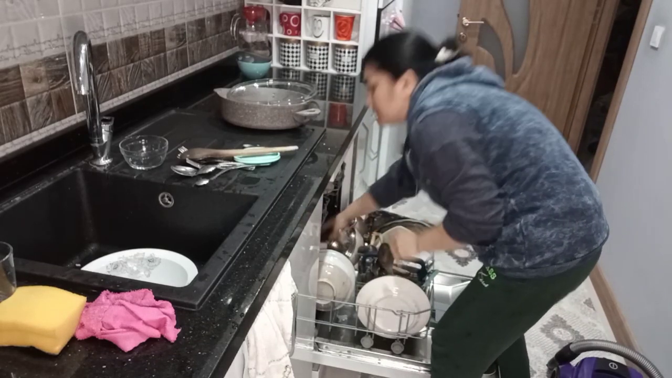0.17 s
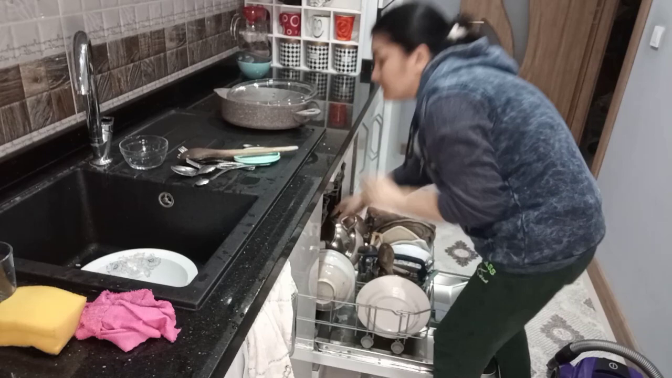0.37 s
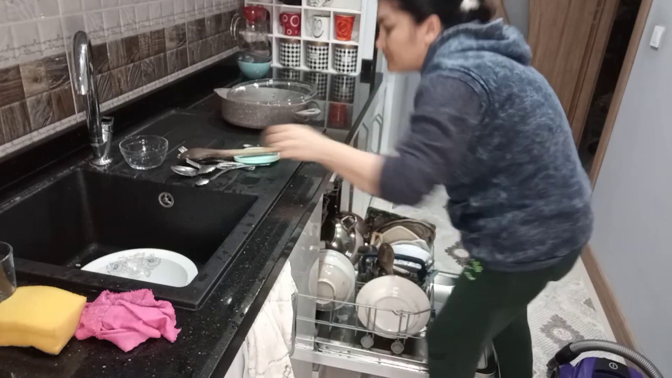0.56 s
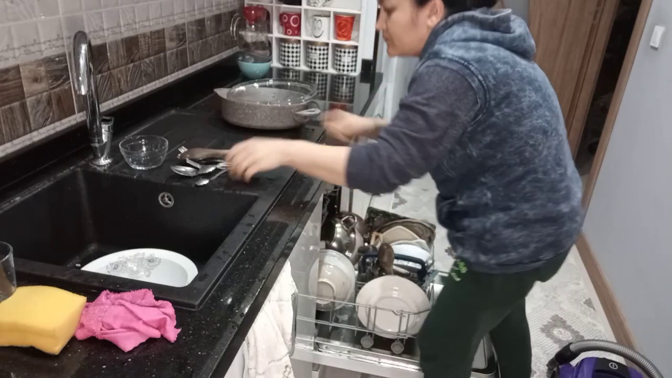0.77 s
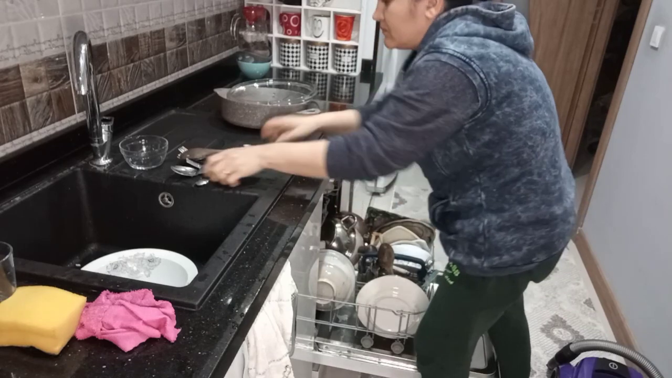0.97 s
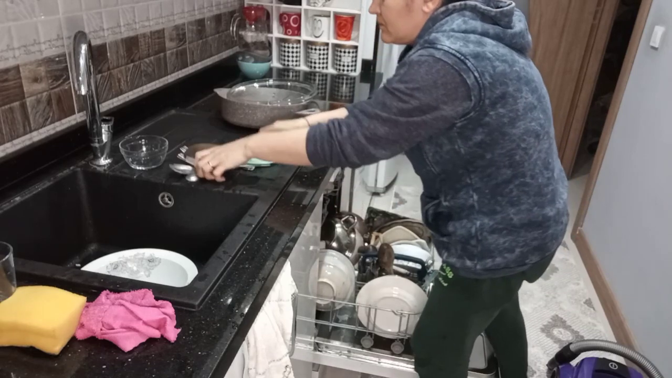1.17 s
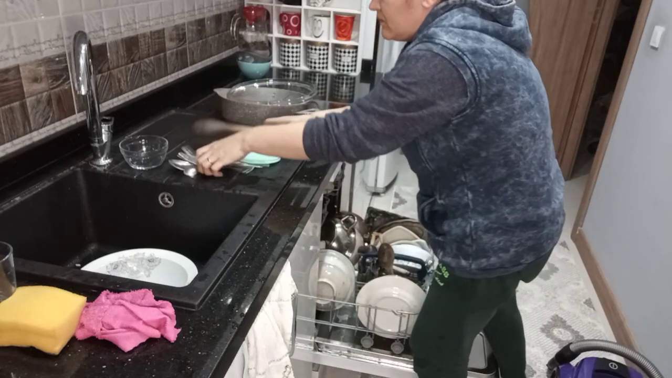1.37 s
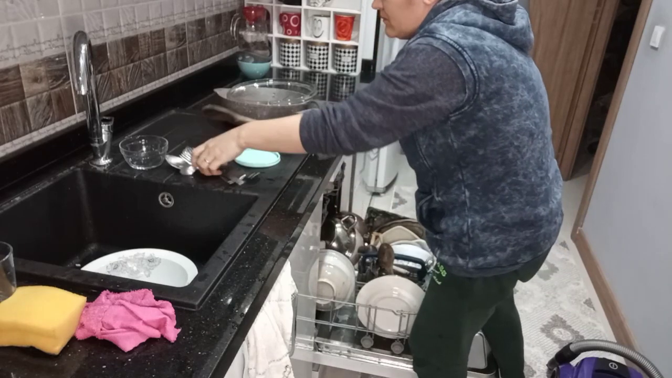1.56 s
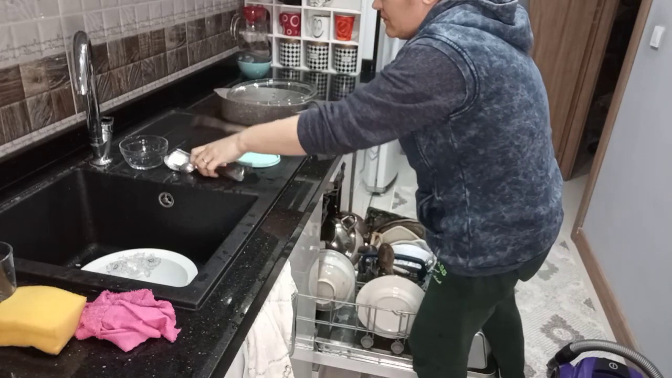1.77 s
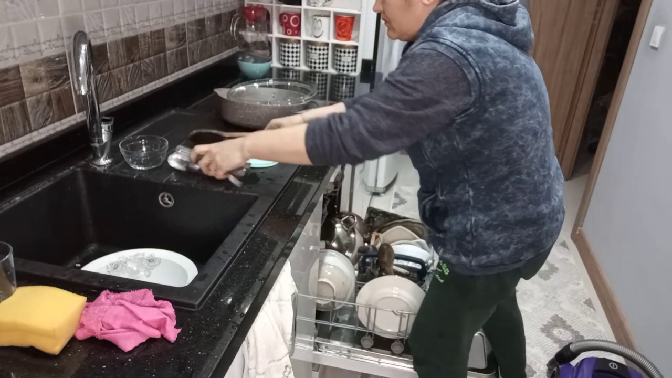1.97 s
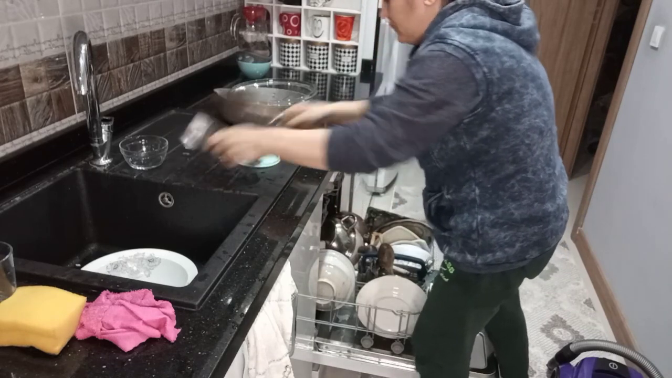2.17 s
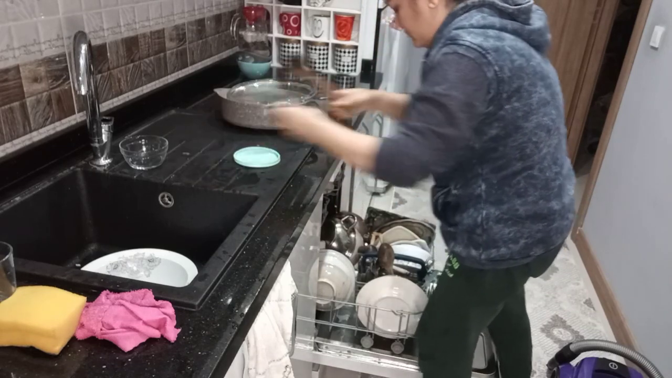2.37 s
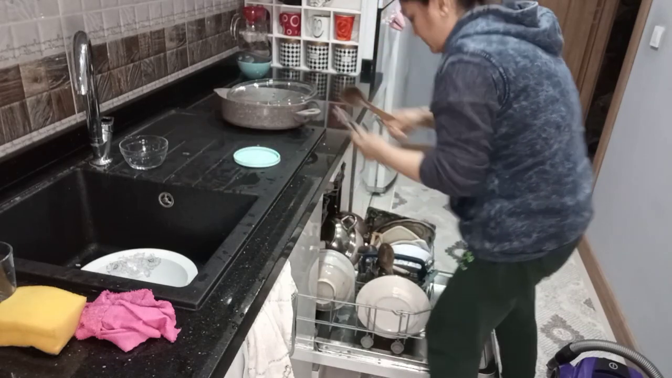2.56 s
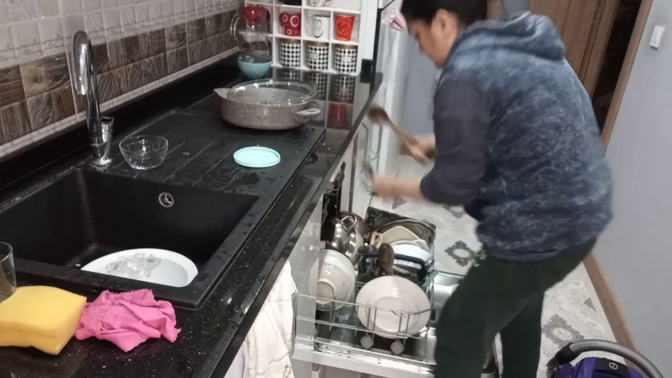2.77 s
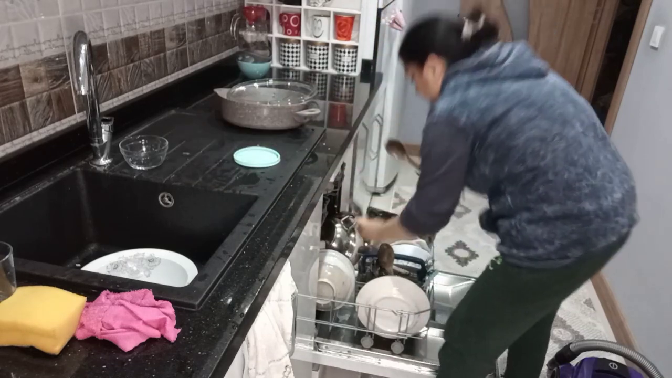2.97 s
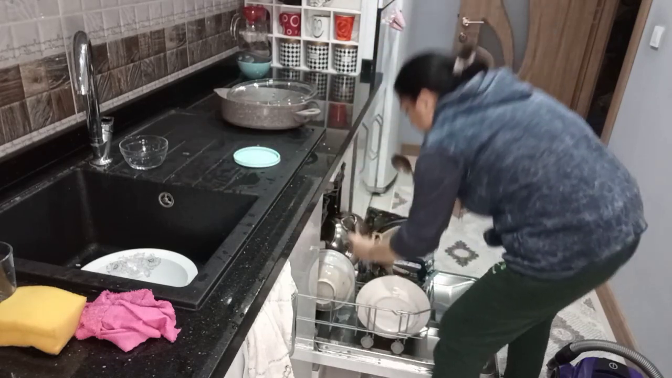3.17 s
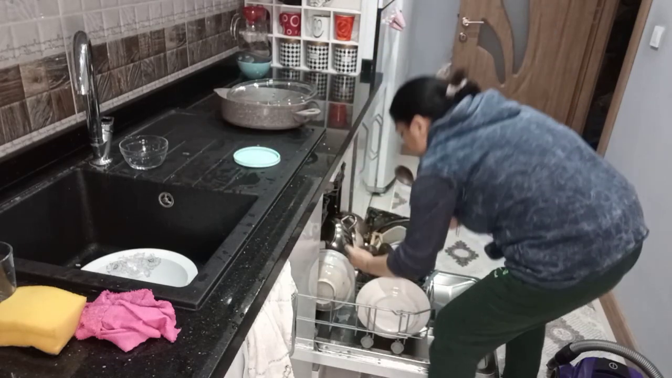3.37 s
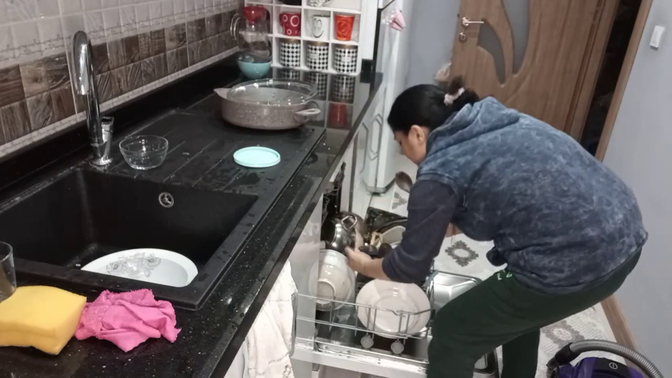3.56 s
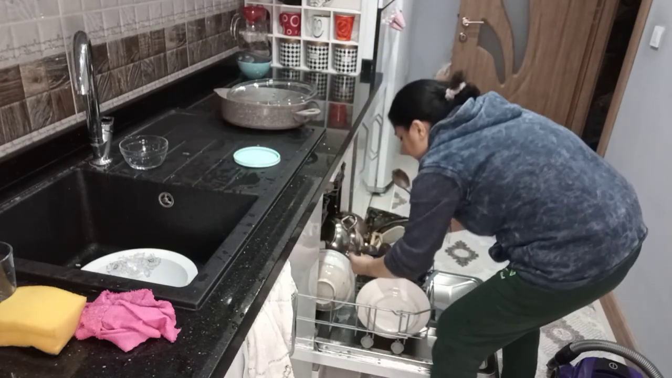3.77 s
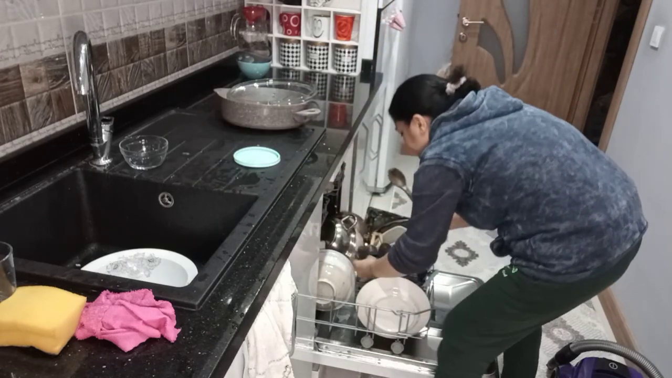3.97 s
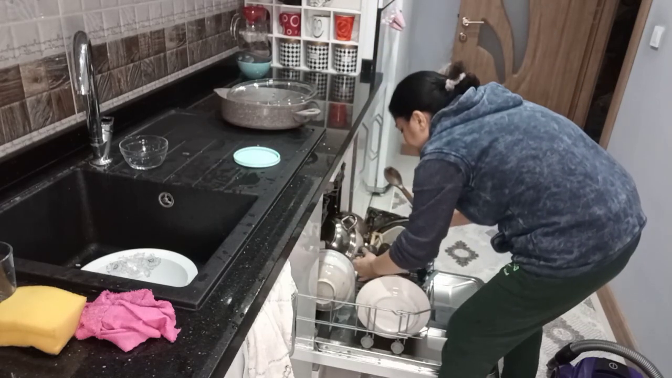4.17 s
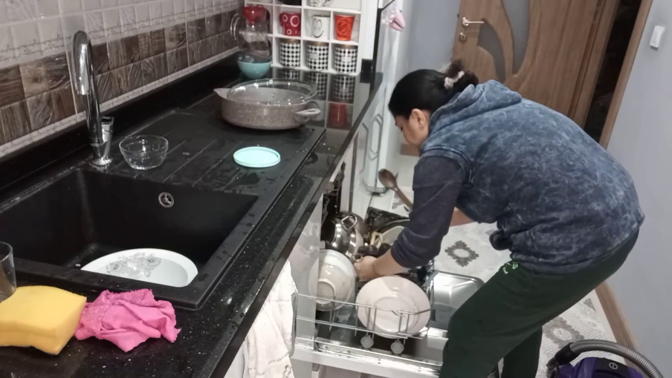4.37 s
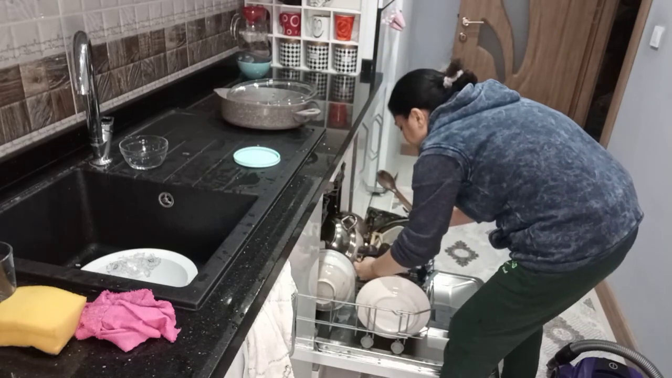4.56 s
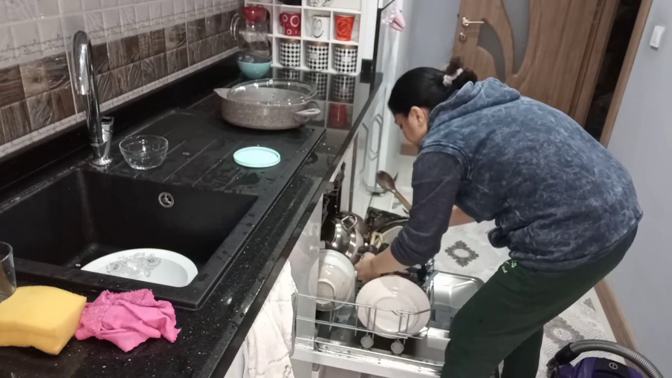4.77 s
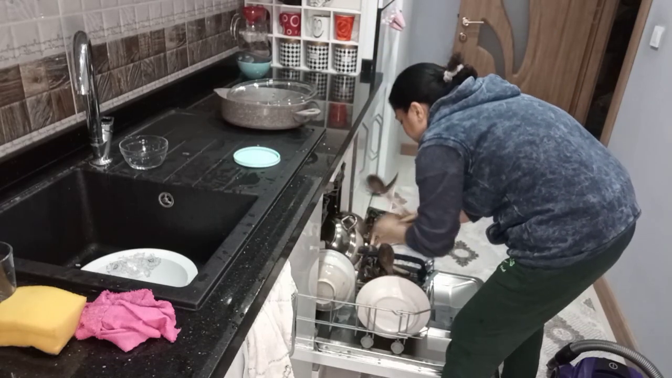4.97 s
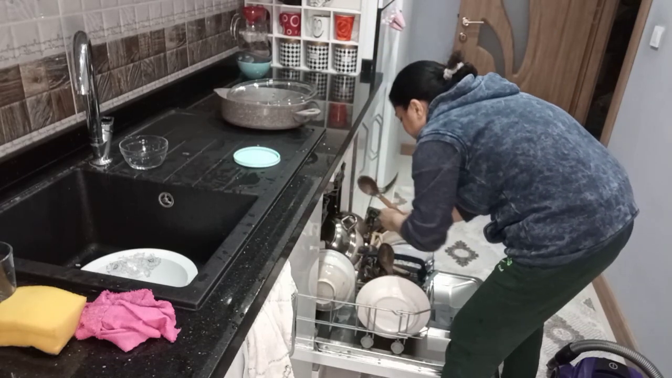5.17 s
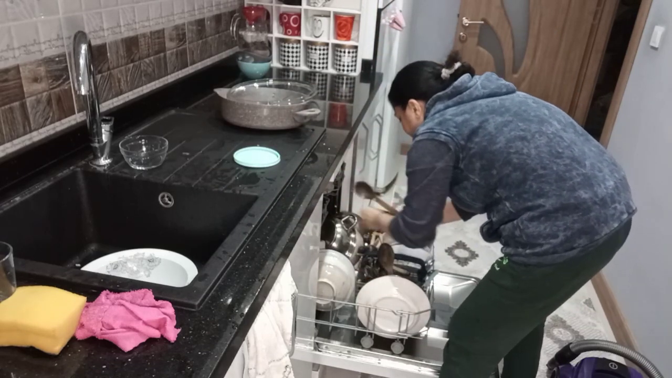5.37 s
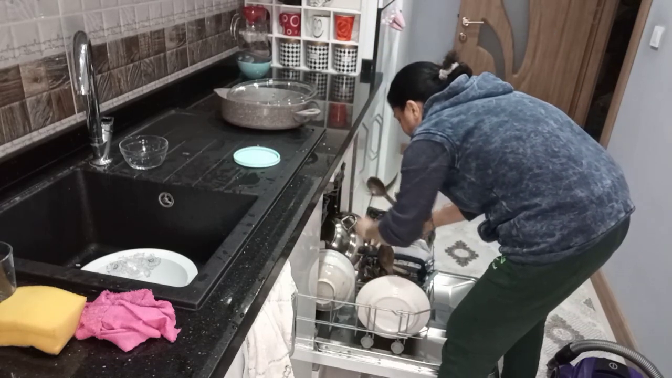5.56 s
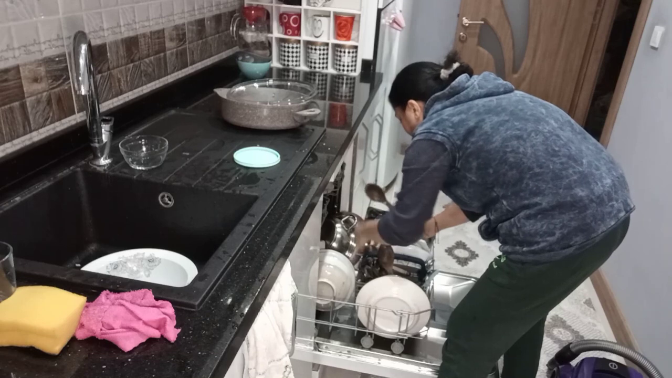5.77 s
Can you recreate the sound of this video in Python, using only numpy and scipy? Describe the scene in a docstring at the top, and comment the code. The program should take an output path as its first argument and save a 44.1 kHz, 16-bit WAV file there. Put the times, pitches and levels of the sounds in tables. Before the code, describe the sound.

Dull rack knocks, then spoons clink and scrape across a stone worktop before cutlery clatters brightly into a dishwasher basket in a tiled kitchen.

```python
"""Cutlery is gathered from a stone worktop and dropped into a plastic dishwasher basket in a tiled kitchen.
Dull knocks in the rack come first; more follow, with a few lighter clinks: resonances, ticks, rebounds.
From 1.1 s spoons clink and scrape on the stone, and near 2 s a large one rings: force pulses excite steel.
From 3.5 s pieces clatter into the basket and jostle; long modes of the bundle and single pieces sing on.
Banded hiss and a hum lie under it all, joined by a faint low drone from 3.1 to 4.25 s."""
import sys
import numpy as np
from scipy import signal
from scipy.fft import rfft, irfft
from scipy.io import wavfile

SR = 44100
rng = np.random.default_rng(int(sys.argv[2]) if len(sys.argv) > 2 else 0)


def wav_record(signal):
    """Record a signal, one row per channel, as 16-bit PCM in the file named by sys.argv[1]."""
    frames = np.transpose(np.atleast_2d(signal))
    bounded = np.clip(frames, -1, 1)
    # unit amplitude maps onto the largest positive 16-bit level
    quanta = np.round(bounded * 32767).astype(np.int16)
    wavfile.write(sys.argv[1], SR, quanta)


N = 257103
TIME = np.arange(N) / SR


def from_db(db):
    """Amplitude factor for a level in dB."""
    return 10 ** (np.asarray(db) / 20)


def rms_one(x):
    """Scales a signal to an rms of 1."""
    return x / np.sqrt(np.mean(x ** 2) + 1e-20)


def unit_energy(x):
    """Scales a signal so that its squares sum to 1."""
    return x / np.sqrt(np.sum(x ** 2) + 1e-20)


def at_hz(points, hz):
    """Reads a table along log frequency."""
    table = np.array(points)
    return np.interp(np.log(hz + 1), np.log(table[:, 0]), table[:, 1])


def level_curve(points_s, levels_db):
    """Amplitude that follows breakpoints in dB, practically silent outside them."""
    return lambda t: from_db(np.interp(t, points_s, levels_db, left=-200, right=-200))


def band(x, low, high, order=3):
    """Butterworth band-pass."""
    edges = [low, min(high, SR / 2 - 100)]
    return signal.sosfilt(signal.butter(order, edges, "band", fs=SR, output="sos"), x + 1e-18)


def through(x, response):
    """Convolves a sound with a response, cut to the scene's length."""
    return signal.oaconvolve(x, response)[:N]


def colour(spectrum, peaks, size=2048):
    """Causal (minimum-phase) response with a broad spectrum and resonances on top."""
    hz = np.fft.rfftfreq(size, 1 / SR)
    db = at_hz(spectrum, hz) + sum(boost / (1 + (2 * (hz - f) / width) ** 2) for f, width, boost in peaks)
    # folding the cepstrum onto positive time makes the phase minimal
    cepstrum = irfft(np.log(from_db(db)))
    cepstrum[1:size // 2] *= 2
    cepstrum[size // 2 + 1:] = 0
    return irfft(np.exp(rfft(cepstrum)))


def dying(start, t60, rise_s=0.0028):
    """Amplitude of something struck at start: a short rise, then a steady fall in dB."""
    rise = np.clip((TIME - start) / rise_s, 0, 1)
    return rise * from_db(-60 * np.clip((TIME - start) / t60, 0, 2))


def drift(rate_hz):
    """Smooth random wandering with a spread of 1."""
    hz = np.fft.rfftfreq(N, 1 / SR)
    count = int(np.sum(hz < 200))   # drawn at a low sample rate, then interpolated
    white = rfft(rng.standard_normal(4 * count))
    slow = irfft(white / (1 + (hz[:2 * count + 1] / rate_hz) ** 4))
    return np.interp(np.linspace(0, len(slow) - 1, N), np.arange(len(slow)), rms_one(slow))


def tone(hz, waver):
    """A mode as heard among its own reflections, which make it waver; rms 1."""
    phase = 2 * np.pi * hz * TIME
    steady = (np.sqrt(2) + waver * drift(37)) * np.sin(phase)
    return rms_one(steady + waver * drift(22) * np.cos(phase))


def ring(force, hz, t60):
    """One mode as a two-pole resonator; a unit click leaves unit energy in it."""
    r, w = from_db(-60 / (t60 * SR)), 2 * np.pi * hz / SR
    mode = signal.lfilter([0, np.sin(w)], [1, -2 * r * np.cos(w), r * r], force + 1e-18)
    return np.sqrt(2 * (1 - r * r)) * mode


def resonance(hz, octaves, size=8192):
    """Response of a broad or narrow resonance to a click; unit energy."""
    half = 2 ** (octaves / 2)
    return unit_energy(band(signal.unit_impulse(size), hz / half, hz * half, order=2))


# decay of the tiled room: [f/Hz, t60/s]
ROOM_DECAY = [(100, 0.4), (400, 0.39), (1000, 0.48), (3000, 0.49), (7000, 0.41), (11000, 0.34),
              (16000, 0.33)]


def kitchen(direct_db=-17, build_s=0.0035, early_db=-2, early_s=0.008):
    """Room response: a weak direct sound, dense early reflections, a tail whose decay varies with pitch."""
    t = TIME[:SR // 2]
    edges = np.geomspace(40, 20000, 10)
    white, hz, tail = rfft(rng.standard_normal(len(t))), np.fft.rfftfreq(len(t), 1 / SR), 0
    swell = (1 + from_db(early_db) * np.exp(-t / early_s)) * (1 - np.exp(-t / build_s))
    for low, high in zip(edges, edges[1:]):
        decay = from_db(-60 * t / at_hz(ROOM_DECAY, np.sqrt(low * high)))
        echoes = irfft(white * (hz >= low) * (hz < high), len(t)) * swell * decay
        tail = tail + unit_energy(echoes) * np.sqrt(high - low)   # equal energy per Hz
    response = unit_energy(tail)
    response[0] += from_db(direct_db)
    return unit_energy(response)


# broad colour of the quiet kitchen: [f/Hz, relative level per Hz/dB]
HISS_COLOUR = [(25, -10), (70, -5), (150, -2.5), (300, -4.5), (600, -7), (1200, -17.5), (1700, -3),
               (2500, 3), (3100, -13.5), (4400, -5), (7000, -7.5), (11700, -9), (12400, -24.5),
               (16000, -40.5)]
# bands where the hiss stands out: [f/Hz, width/Hz, boost/dB]
HISS_BANDS = [(2170, 353, 12.7), (4353, 84, 15), (4906, 420, 12.7), (7300, 73, 13), (8790, 170, 12.5),
              (15200, 2100, 24)]
# the drone comes and goes: [t/s, level/dB]
DRONE_LEVEL = [(3.1, -99), (3.35, -75), (4.05, -71.5), (4.25, -90)]
DRONE_HZ, HUM_HZ, HUM_DB, HISS_DB = 219, 101.6, -82.5, -68


def background():
    """Coloured noise for the banded hiss, wavering sines for the hum and the passing drone."""
    hiss = rms_one(through(rng.standard_normal(N), colour(HISS_COLOUR, HISS_BANDS)))
    hum = from_db(HUM_DB) * tone(HUM_HZ, waver=0.51)
    drone = level_curve(*np.transpose(DRONE_LEVEL))(TIME) * tone(DRONE_HZ, waver=0.67)
    return from_db(HISS_DB) * hiss + hum + drone


GRAZE_S, GRAZE_DB = .005, -12.5   # a weaker touch just before each strike

# knocks in the rack and a few lighter clinks:
# [t/s, f/Hz, relative level/dB, width/octaves, rebound against the first contact/dB]
KNOCKS_AND_CLINKS = [(0.057, 834, -48, 0.51, -7.5), (.17, 282, -62, 0.67, -14),
                     (0.194, 830, -52.5, 0.32, -14), (.286, 667, -48.5, 0.95, -2),
                     (0.365, 227, -59.5, 0.22, -14), (.929, 417, -68, 1.8, -6.5),
                     (2.202, 1260, -60, 2.5, -32), (2.778, 4200, -62.5, 0.2, -30),
                     (3.673, 673, -50.5, 3.4, -11), (3.914, 1590, -47, 1.2, -3),
                     (4.192, 233, -56.5, 0.33, -21), (4.31, 414, -45, 0.54, -21.5),
                     (4.663, 890, -60.5, 2.3, -5), (4.74, 2030, -44.5, 1.6, -15),
                     (4.746, 390, -51.5, 1.6, -31), (5.008, 800, -49, 1.24, -12.5),
                     (5.205, 5960, -61, 0.11, -25), (5.208, 4220, -59, 0.18, -23),
                     (5.342, 346, -62, 0.3, -24), (5.382, 340, -61, 0.85, -21),
                     (5.728, 790, -55.5, 0.36, -15.5)]
REBOUND_S, REBOUND_PITCH, REBOUND_OCTAVES = .031, .5, 1.16   # later and an octave lower
TICK_PITCH, TICK_OCTAVES, TICK_DB = 2.9, 1.27, -14   # pitch and level against a firm contact
FIRM_DB, TICK_GROWTH = -51, 0.3   # the tick gains on the resonance, in dB per dB beyond a firm contact


def knocks_and_clinks(level_db, second_tick_db=4):
    """Knocks and clinks: a broad or narrow resonance and a tick, then a lower rebound with its own tick."""
    out = np.zeros(N + SR)
    for s, hz, db, octaves, rebound_db in KNOCKS_AND_CLINKS:
        tick_db = db + TICK_DB + TICK_GROWTH * (db - FIRM_DB)
        tick = from_db(tick_db) * resonance(hz * TICK_PITCH, TICK_OCTAVES)
        first = from_db(db) * resonance(hz, octaves) + tick
        lower = from_db(db) * resonance(hz * REBOUND_PITCH, REBOUND_OCTAVES)
        second = lower + from_db(second_tick_db) * tick
        graze = (s - GRAZE_S, from_db(GRAZE_DB) * first)
        rebound = (s + REBOUND_S, from_db(rebound_db) * second)
        for start, contact in [graze, (s, first), rebound]:
            at = int(start * SR)
            out[at:at + len(contact)] += contact
    return from_db(level_db) * out[:N]


# single pieces left free to sing at one pitch: [t/s, f/Hz, level/dB]
SINGING_PIECES = [(4.106, 14680, -26.5), (4.121, 14530, -22), (4.16, 5590, -44.5), (4.291, 3520, -48),
                  (4.3, 5380, -46), (4.562, 14700, -36), (4.748, 12600, -67), (4.871, 6800, -53),
                  (4.89, 15270, -37), (4.944, 8823, -49.5), (4.995, 11430, -57.5), (5.003, 7030, -55.5)]
# the highest modes die soonest: [f/Hz, t60/s]
SINGING_DECAY = [(3500, 0.27), (6500, .38), (12500, 0.22), (14600, 0.08)]


def free_rings():
    """Now and then one piece hangs free and sings: a wavering sine with a pitch-dependent decay."""
    return sum(from_db(db) * dying(s, at_hz(SINGING_DECAY, hz)) * tone(hz, waver=0.44)
               for s, hz, db in SINGING_PIECES)


# modes of the large spoon: [f/Hz, relative level/dB, free t60/s]
SPOON_MODES = [(3510, -7.5, 0.27), (5898, 1, 0.2), (6300, -25, 0.34), (6750, -19, 0.17), (8860, -19, 0.21),
               (12000, -29, 0.15)]
# its touches on the stone: [t/s, relative level/dB, tilt/dB per octave, share of the free ring time]
SPOON_TOUCHES = [(1.963, -21.5, 11, 0.11), (1.985, -39, -13.5, 0.35), (1.997, -36, -1.5, 0.7),
                 (2.011, -31, 4.5, 0.89), (2.024, -47, 5, 0.88)]


def spoon(pivot_hz=5900):
    """The large spoon rocks on the stone; each touch adds energy to its modes, the first heavily damped."""
    out = np.zeros(N)
    for hz, mode_db, t60 in SPOON_MODES:
        energy = 0
        for s, db, tilt_db, free in SPOON_TOUCHES:
            touch_db = db + mode_db + tilt_db * np.log2(hz / pivot_hz)
            energy = energy + (from_db(touch_db) * dying(s, t60 * free)) ** 2
        out += np.sqrt(energy) * tone(hz, waver=.35)
    return out


def blows(times, levels_db, shares_db, bounce_s=.006, bounce_db=-6, count=3):
    """Force of the blows in each register: a graze, a click and a few ever weaker bounces."""
    force = np.zeros(N + SR)
    gaps = bounce_s * rng.uniform(.4, 1.6, (len(times), count))
    clicks = unit_energy(from_db(bounce_db * np.arange(count)))
    for s, db, gap in zip(times, levels_db, gaps):
        at = ((s + np.cumsum(gap) - gap[0]) * SR).astype(int)
        force[at] += from_db(db) * clicks * rng.choice([-1, 1], count)
        force[int((s - GRAZE_S) * SR)] += from_db(db + GRAZE_DB)
    return np.outer(from_db(shares_db), force[:N])


def slide(pressure, shares_db, per_s=280, spread_db=3.5):
    """Force of steel catching and slipping: a dense run of uneven ticks."""
    sizes = from_db(spread_db * np.minimum(rng.exponential(1, N), 4)) * rng.choice([-1, 1], N)
    ticks = rms_one(sizes * (rng.random(N) < per_s / SR))
    return np.outer(from_db(shares_db), pressure * ticks)


def thump(force, resonances):
    """The low resonances of a support, driven by the force in the lowest register."""
    return through(force[0], sum(from_db(db) * resonance(hz, octaves) for hz, octaves, db in resonances))


# edges of the registers body (support), clack (contact), clang (bending steel), ping (top modes): [f/Hz]
REGISTER_EDGES = [250, 1200, 4500, 9000, 17000]
# broad resonances of the cutlery: [f/Hz, width/Hz, boost/dB]
STEEL_RESONANCES = [(1800, 740, 12), (5790, 190, 3.5), (6710, 540, 6), (10640, 430, 0.5),
                    (16500, 1500, 3.5)]
CLINK_T60_S = .05


def cutlery(force, spectrum, clink_db, clink_t60, count=24):
    """Each touch gives a short crack, and a clink at the pitches of whichever piece it happens to hit."""
    crack, out = colour(spectrum, STEEL_RESONANCES), np.zeros(N)
    for register, (push, low, high) in enumerate(zip(force, REGISTER_EDGES, REGISTER_EDGES[1:])):
        out += through(push, unit_energy(band(crack, low, high, order=4)))
        if register == 0:   # the support only knocks
            continue
        pitches = np.linspace(low, high, count + 1)[:-1] + rng.uniform(0, (high - low) / count, count)
        strengths = rms_one(np.abs(signal.freqz(crack, worN=pitches, fs=SR)[1]))
        piece = rng.integers(0, count // 2, N)   # each piece owns two pitches in a register
        clinks = sum(strength * ring(push * (piece == k // 2), hz, clink_t60)
                     for k, (hz, strength) in enumerate(zip(pitches, strengths)))
        out += from_db(clink_db) * band(clinks, low, high, order=2)
    return out


# share of a contact's force in each register, steel on steel being brightest: [relative level/dB]
STEEL_SHARES = [-19, -8, -1, 1]
STONE_SHARES = [1.5, -2, -9, -25]
# cutlery knocks together on the worktop and in the hand: [t/s, steel relative level/dB, stone same]
STONE_HITS = [(1.142, -57.5, -57), (1.176, -79, -53), (1.219, -50.5, -50.5), (1.251, -40.5, -37.5),
              (1.261, -41.5, -62), (1.445, -51, -58.5), (1.585, -45, -58), (1.602, -46.5, -58),
              (1.716, -41.5, -46.5), (1.808, -43, -79), (1.952, -72, -46.5), (1.964, -42, -41.5),
              (2.349, -66.5, -100), (2.527, -67.5, -95), (2.779, -58, -92), (2.919, -67.5, -95)]
# sweep of the spoons over the worktop: [t/s, steel relative level/dB, stone relative level/dB]
STONE_SWEEP = [(1.14, -73, -66), (1.208, -64, -82), (1.33, -55, -55), (1.402, -52, -59),
               (1.546, -49.5, -53), (1.652, -43.5, -55.5), (1.766, -51.5, -61.5), (1.858, -50, -65.5),
               (1.945, -67, -59.5)]
# colour of steel on the stone: [f/Hz, relative level per Hz/dB]
STONE_COLOUR = [(120, -7), (200, -14), (268, -12.5), (322, -7), (509, -5.5), (821, -11.5), (916, -4),
                (1140, -11), (2330, 1), (3620, 2.5), (6640, 12), (8270, 1.5), (13600, 5.5), (15100, 10),
                (16000, 7)]
# the slab's thump: [f/Hz, width/octaves, relative level/dB]
SLAB_RESONANCES = [(126, 0.94, -11), (143.3, 0.075, -10.5), (175.7, 0.082, -13)]


def worktop(hit_db=28, steel_slide_db=-5, stone_slide_db=2, clink_db=-3, lead_s=0.018):
    """Spoons are swept together on the stone: blows and slip ticks excite steel, and the slab thumps dry."""
    s, steel_db, stone_db = np.transpose(STONE_HITS)
    hits = blows(s, steel_db, STEEL_SHARES) + blows(s, stone_db, STONE_SHARES)
    s, *sweep_db = np.transpose(STONE_SWEEP)
    # the sweep runs slightly ahead of its table
    steel, stone = (level_curve(s, db)(TIME + lead_s) for db in sweep_db)
    force = from_db(hit_db) * hits
    force += from_db(steel_slide_db) * slide(steel, STEEL_SHARES)
    force += from_db(stone_slide_db) * slide(stone, STONE_SHARES)
    clatter = cutlery(force, STONE_COLOUR, clink_db, CLINK_T60_S)
    return through(clatter, kitchen(direct_db=-9.5, build_s=0.0029)) + thump(force, SLAB_RESONANCES)


# share of the force of steel on plastic in each register: [relative level/dB]
PLASTIC_SHARES = [1.5, -5.5, -23, -14]
# pieces jostled in the basket: [t/s, length/s, steel relative level/dB, plastic relative level/dB]
BASKET_JOSTLES = [(3.789, 0.29, -39, -51.5), (4.065, .26, -31.5, -43.5)]
JOSTLE_ATTACK_S, SETTLE_DB_PER_S = 0.039, 47


def jostles():
    """Force of pieces rubbing in the basket: it sets in quickly and sinks as they settle."""
    steel, plastic = np.zeros((2, N))
    for start, length, steel_db, plastic_db in BASKET_JOSTLES:
        settling = dying(start, 60 / SETTLE_DB_PER_S, JOSTLE_ATTACK_S) * (TIME < start + length)
        steel += from_db(steel_db) * settling
        plastic += from_db(plastic_db) * settling
    return slide(steel, STEEL_SHARES) + slide(plastic, PLASTIC_SHARES)


# modes of the bundle of forks and spoons, and the rack under it: [f/Hz, relative level/dB, t60/s]
BUNDLE_MODES = [(417.3, -3, 0.51), (869.6, -5.5, 0.52), (2722, -7, 1), (3640, -6, 0.059), (4254, -3, 0.28),
                (5390, -5.5, 0.46), (6400, -16, 0.43), (6900, -32, .3), (8990, -10, 0.36),
                (10830, -2, 0.091), (11530, -1.5, 0.16), (11800, -15, .22), (13150, -0.5, 0.071),
                (14400, 3, .2), (15700, -9, 0.27), (15500, -2, .18)]
SET_DETUNE = .0054   # part of the half-width of each cluster, as a share of its pitch


def bundle(force, ring_db=-7, uneven_db=3.5, rise_s=0.01):
    """Touches feed energy into the long modes of their register, unevenly as the contact point shifts."""
    out, rise = np.zeros(N), np.exp(-1 / (rise_s * SR))
    feed = signal.lfilter([1 - rise], [1, -rise], force ** 2 + 1e-18)
    for hz, db, t60 in BUNDLE_MODES:
        keep = from_db(-120 / (t60 * SR))   # energy kept from sample to sample
        register = np.searchsorted(REGISTER_EDGES, hz) - 1
        uneven_feed = feed[register] * from_db(uneven_db * drift(22)) ** 2
        energy = signal.lfilter([1 - keep], [1, -keep], uneven_feed)
        # pieces of one set are tuned almost alike and beat together: narrow-band noise
        spread_hz = 8 + SET_DETUNE * hz
        cluster = rms_one(band(rng.standard_normal(N), hz - spread_hz, hz + spread_hz, order=2))
        out += from_db(db + ring_db) * np.sqrt(energy) * cluster
    return out


# a piece clinks on its neighbours, then lands: [t/s, clink relative level/dB, landing relative level/dB]
BASKET_DROPS = [(3.514, -59.5, -67.5), (3.554, -60, -70), (3.691, -45, -63.5), (3.708, -43, -70),
                (3.829, -56, -64), (3.877, -44.5, -48.5), (3.932, -43.5, -69), (4.102, -47.5, -44),
                (4.124, -44, -57), (4.198, -48, -45.5), (4.25, -41, -43), (4.284, -40.5, -51.5),
                (4.31, -45, -64), (4.334, -45.5, -80), (4.505, -57, -78), (4.558, -50.5, -67.5),
                (4.663, -59, -67.5), (4.741, -58.5, -55.5), (4.87, -41.5, -41), (4.89, -43.5, -59),
                (5.804, -46.5, -52)]
FALL_S = .036   # from clink to landing
# colour of steel in the basket: [f/Hz, relative level per Hz/dB]
BASKET_COLOUR = [(120, -40), (200, -26), (373, -17.5), (409, -5.5), (558, -3.5), (1710, -14.5),
                 (3190, -5.5), (3490, -5), (4860, -6.5), (6760, -1.5), (7970, -9.5), (11300, -2),
                 (13800, -4), (15100, 7.5), (16000, -0.5)]
# the rack's rumble: [f/Hz, width/octaves, relative level/dB]
RACK_RESONANCES = [(120, 1.9, -27.5), (243.5, 0.23, -20), (417, 0.12, -8)]


def basket(hit_db=29, slide_db=-8, width_db=-13):
    """Handles drop into the basket and jostle ringing neighbours; opposite-signed treble gives some width."""
    s, steel_db, landing_db = np.transpose(BASKET_DROPS)
    drops = blows(s, steel_db, STEEL_SHARES) + blows(s + FALL_S, landing_db, PLASTIC_SHARES)
    force = from_db(hit_db) * drops + from_db(slide_db) * jostles()
    clatter = cutlery(force, BASKET_COLOUR, clink_db=-6.0, clink_t60=CLINK_T60_S)
    clatter = clatter + thump(force, RACK_RESONANCES)
    side = from_db(width_db) * band(through(clatter, kitchen()), 7000, 14000)
    return through(clatter, kitchen()) + bundle(force) + side * np.array([[1], [-1]])


def scene():
    """Sums the layers; the clatter, knocks and clinks arrive mostly by way of the walls."""
    rack = through(knocks_and_clinks(level_db=30.5), kitchen(direct_db=-10.0, build_s=0.0033))
    return background() + rack + free_rings() + spoon() + worktop() + basket()


CUTOFF_HZ = 15750


def record(dry):
    """A steep elliptic low-pass cuts the top."""
    return signal.sosfilt(signal.ellip(12, .2, 80, CUTOFF_HZ, fs=SR, output="sos"), dry)


dry = scene()
out = record(dry)
wav_record(out)
```